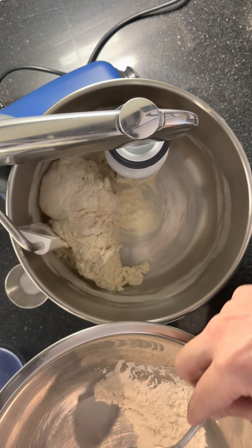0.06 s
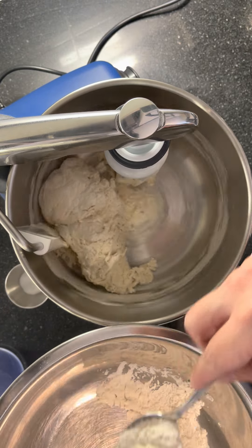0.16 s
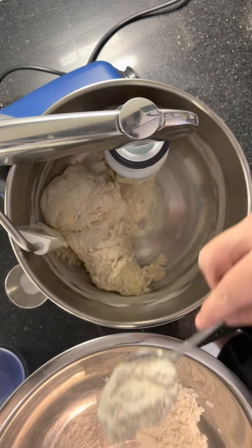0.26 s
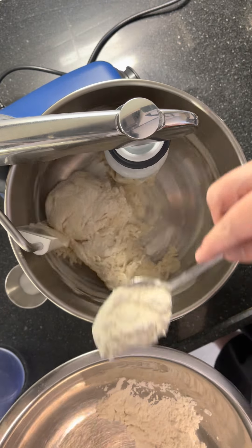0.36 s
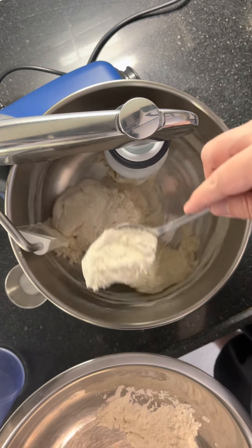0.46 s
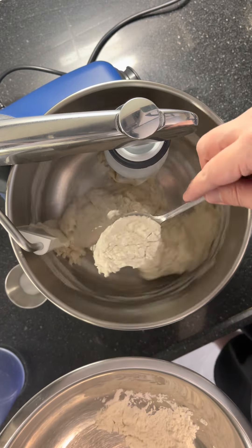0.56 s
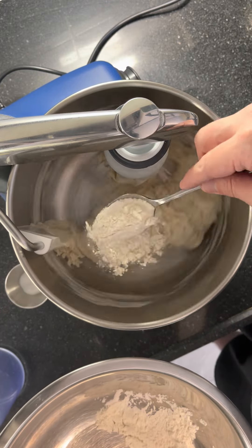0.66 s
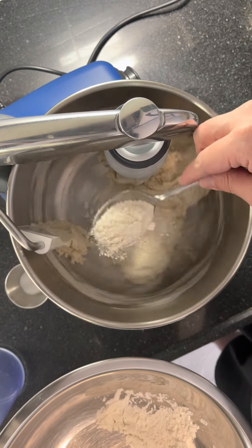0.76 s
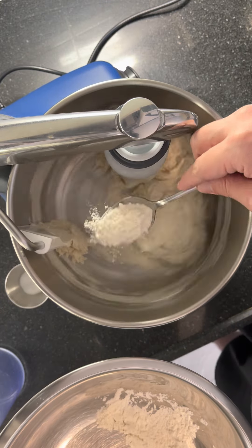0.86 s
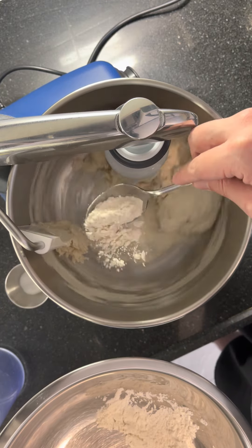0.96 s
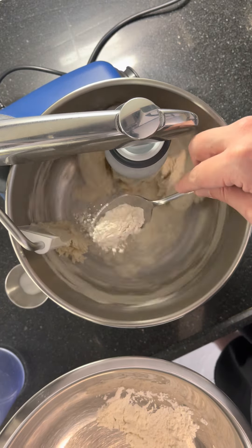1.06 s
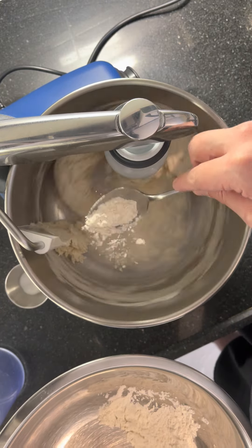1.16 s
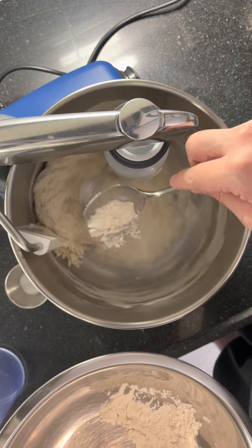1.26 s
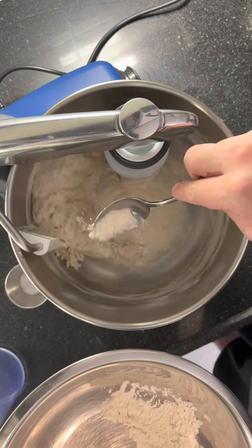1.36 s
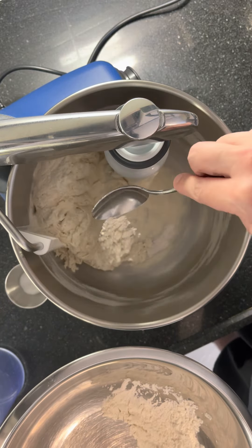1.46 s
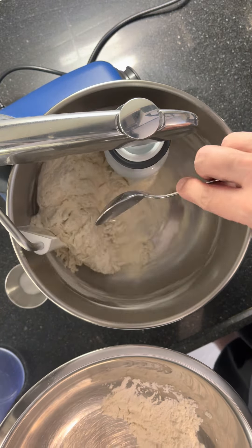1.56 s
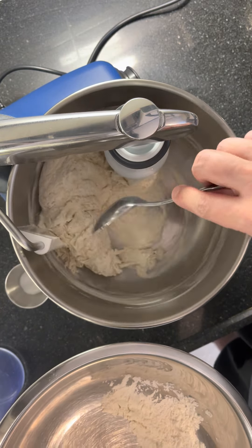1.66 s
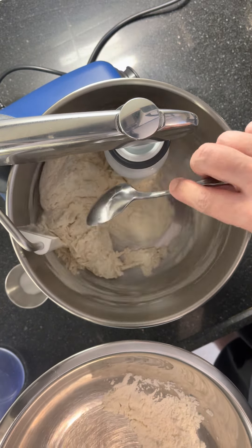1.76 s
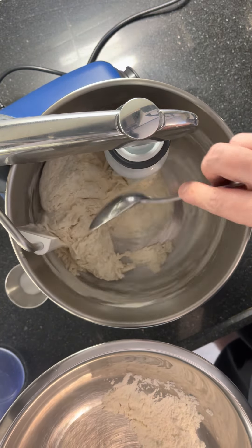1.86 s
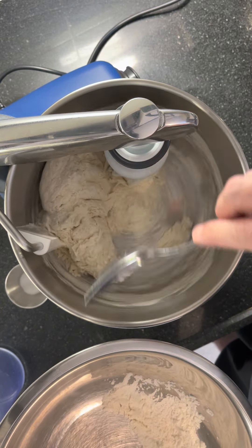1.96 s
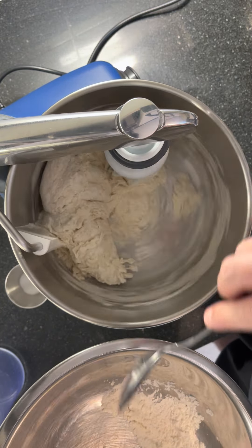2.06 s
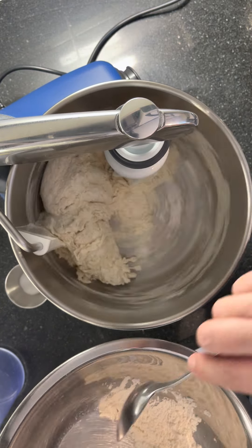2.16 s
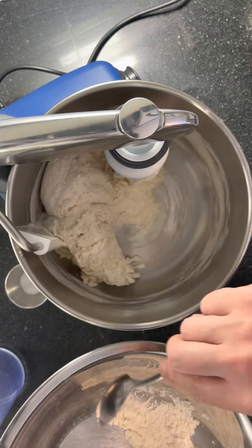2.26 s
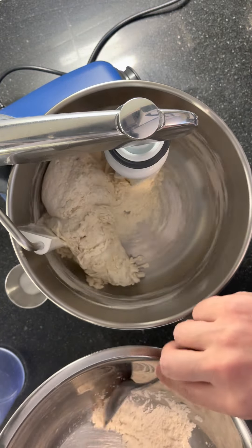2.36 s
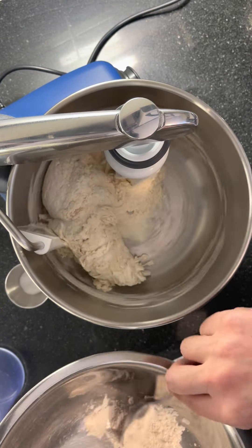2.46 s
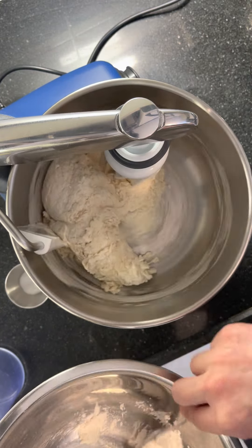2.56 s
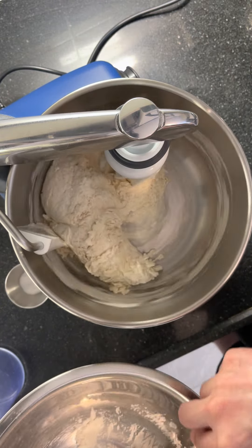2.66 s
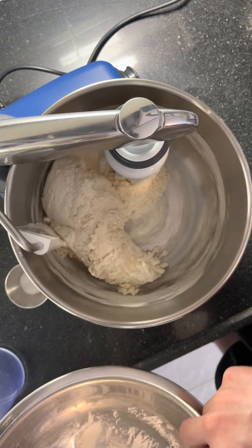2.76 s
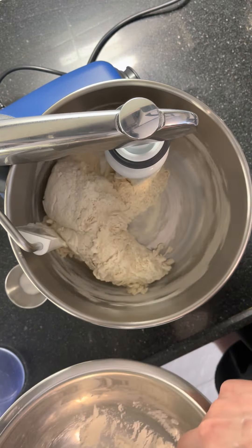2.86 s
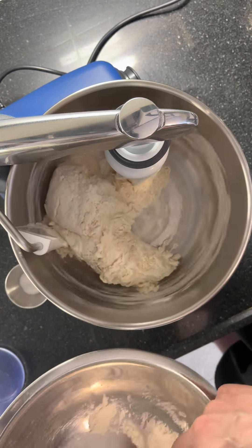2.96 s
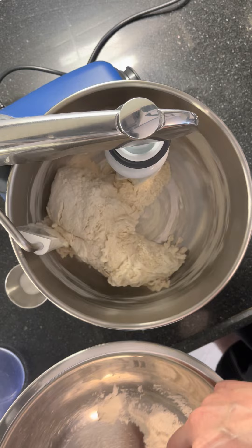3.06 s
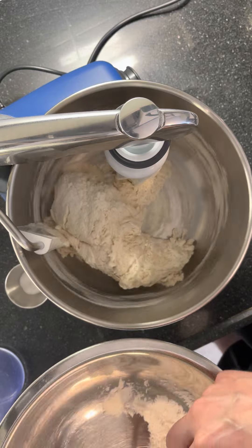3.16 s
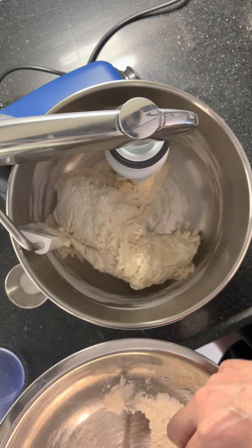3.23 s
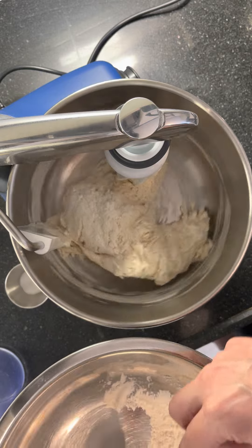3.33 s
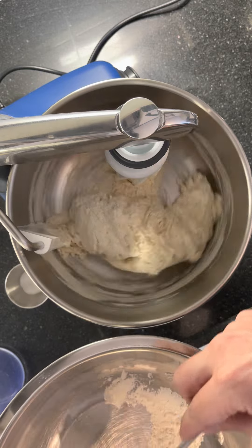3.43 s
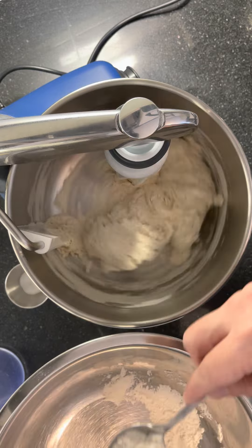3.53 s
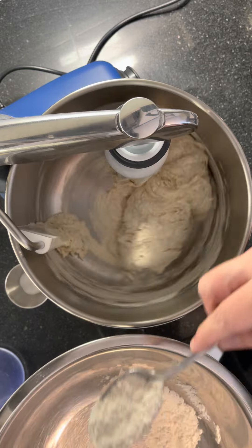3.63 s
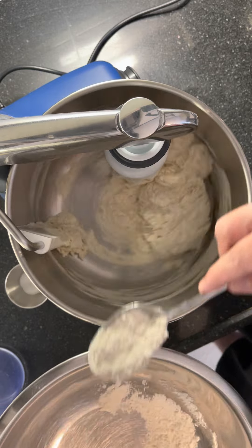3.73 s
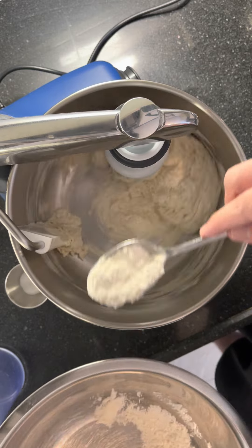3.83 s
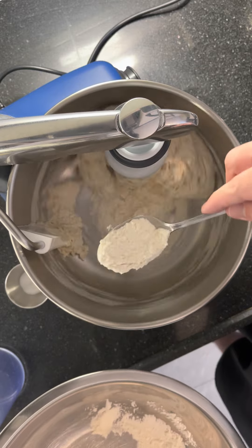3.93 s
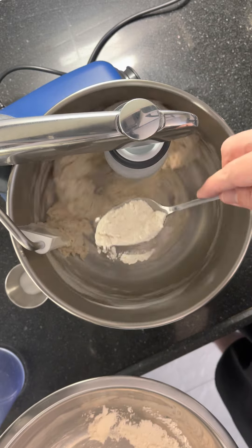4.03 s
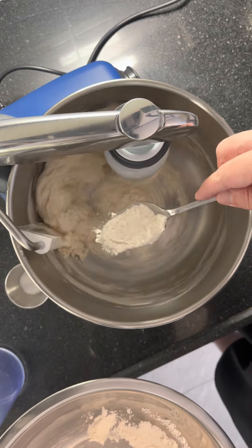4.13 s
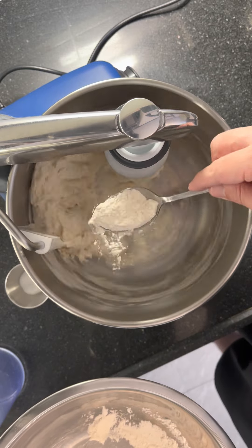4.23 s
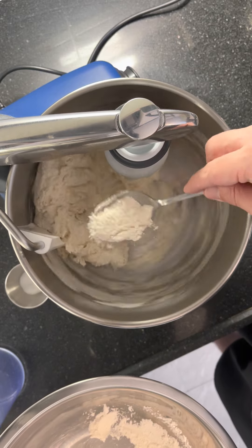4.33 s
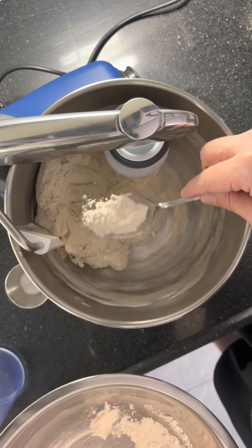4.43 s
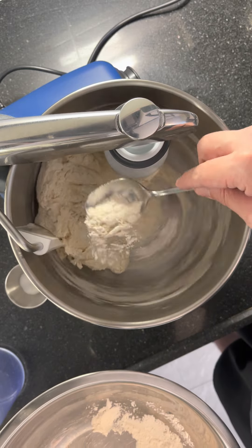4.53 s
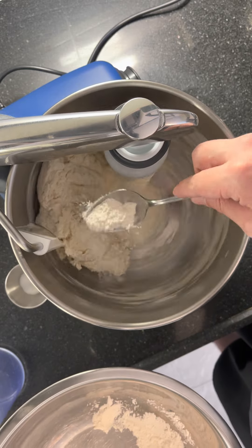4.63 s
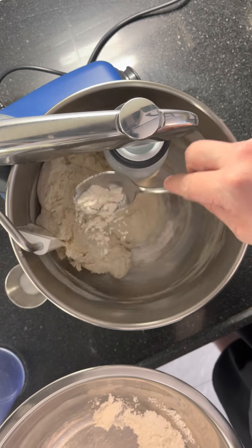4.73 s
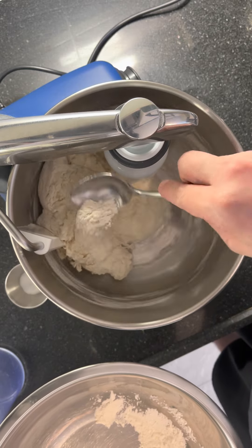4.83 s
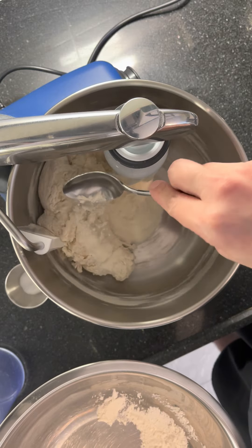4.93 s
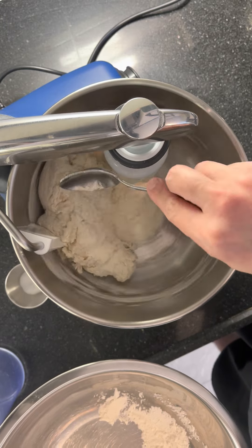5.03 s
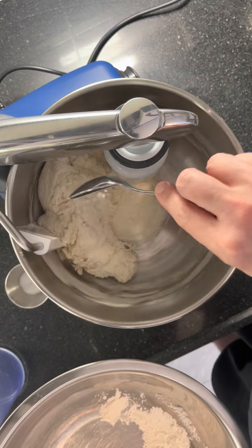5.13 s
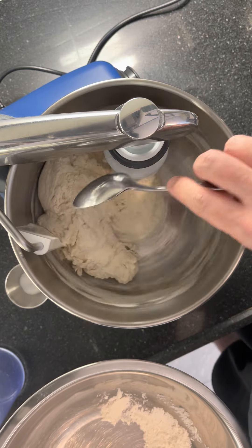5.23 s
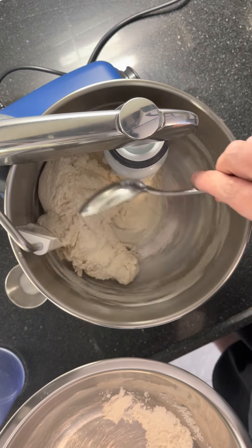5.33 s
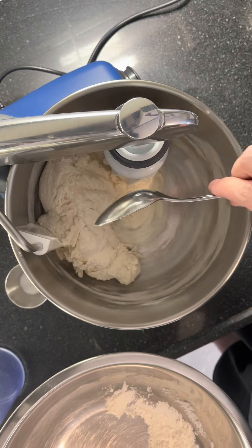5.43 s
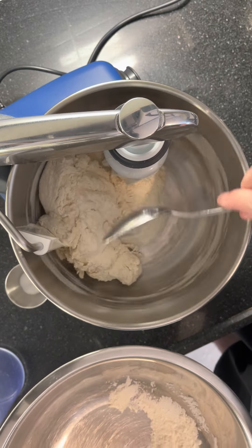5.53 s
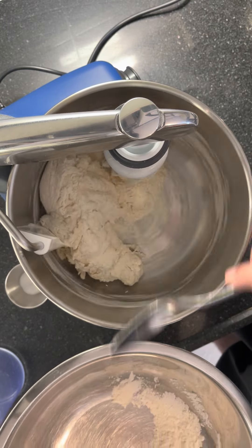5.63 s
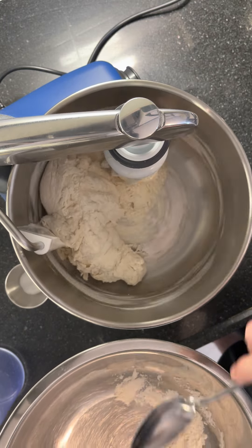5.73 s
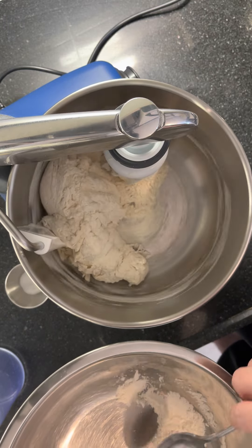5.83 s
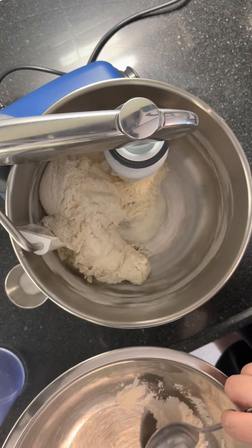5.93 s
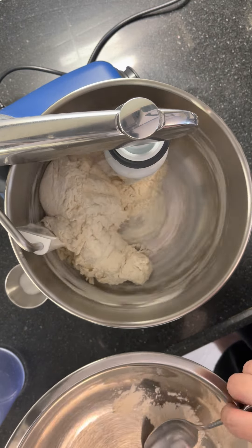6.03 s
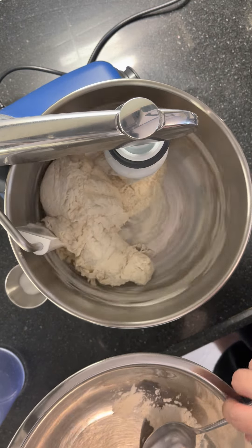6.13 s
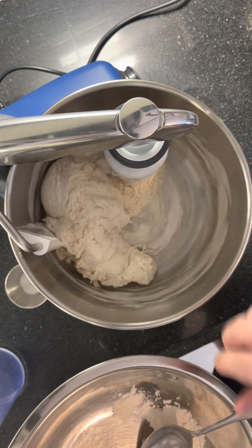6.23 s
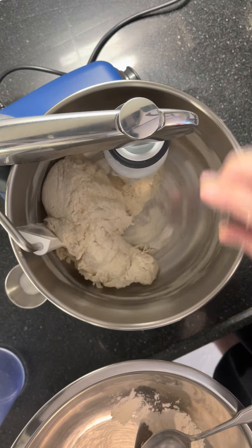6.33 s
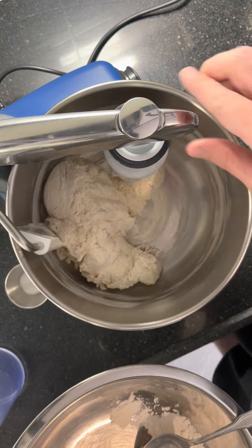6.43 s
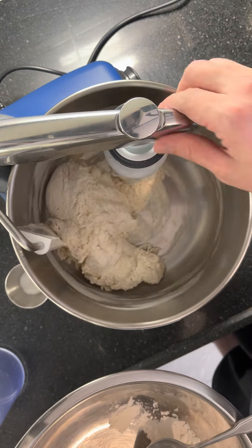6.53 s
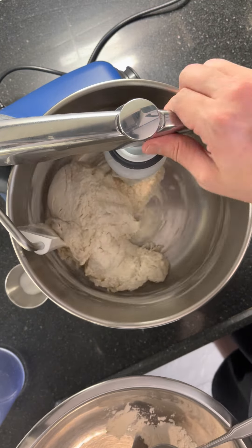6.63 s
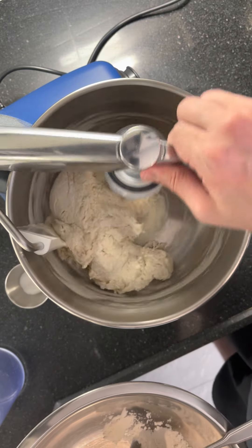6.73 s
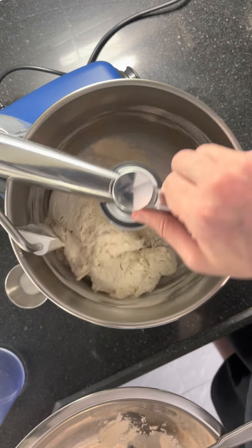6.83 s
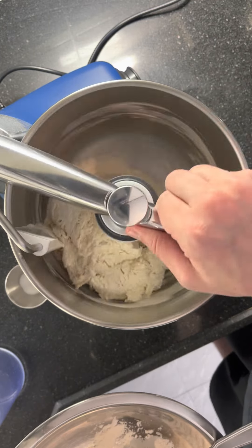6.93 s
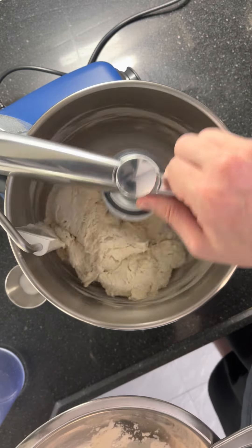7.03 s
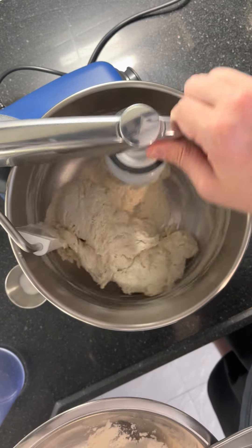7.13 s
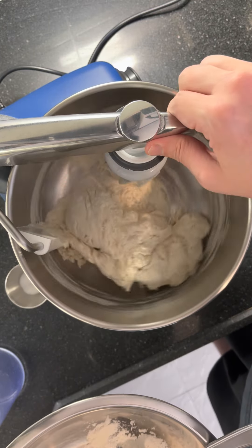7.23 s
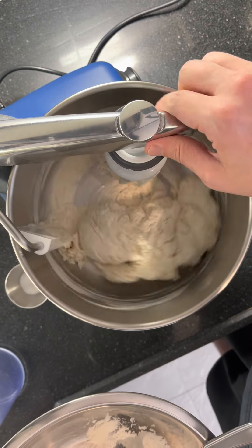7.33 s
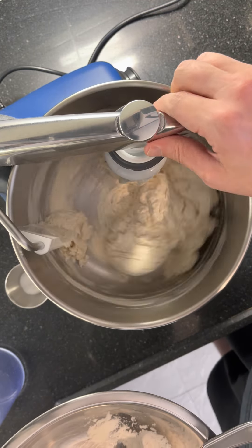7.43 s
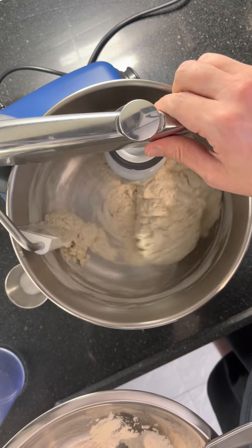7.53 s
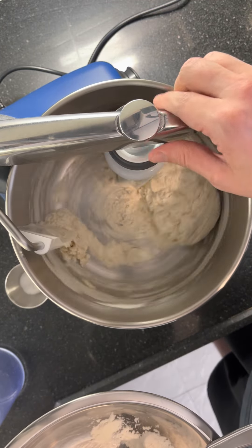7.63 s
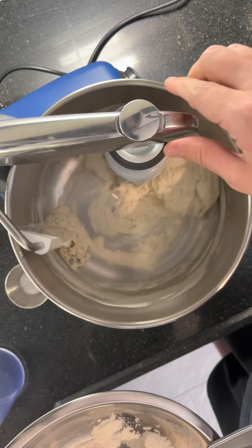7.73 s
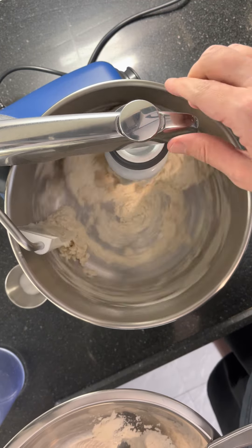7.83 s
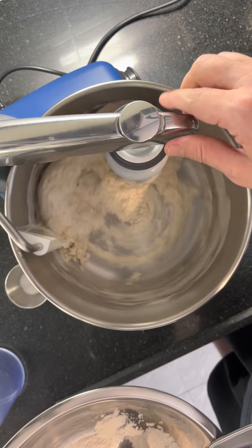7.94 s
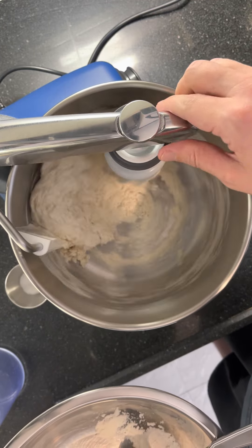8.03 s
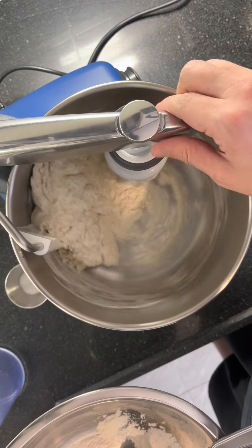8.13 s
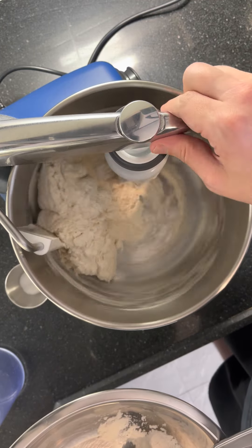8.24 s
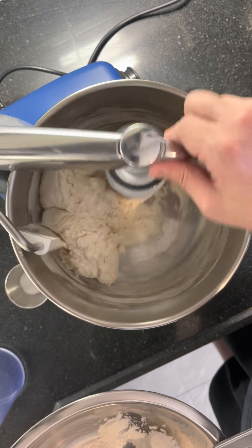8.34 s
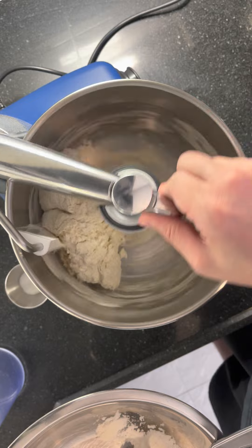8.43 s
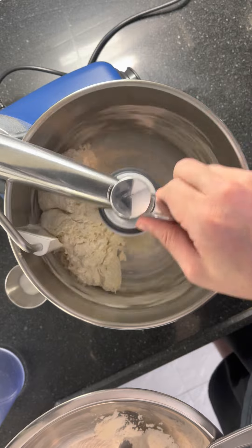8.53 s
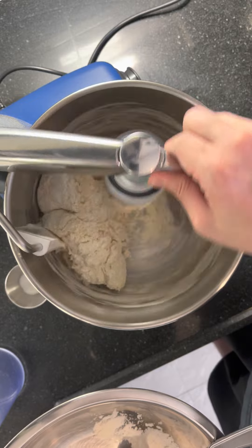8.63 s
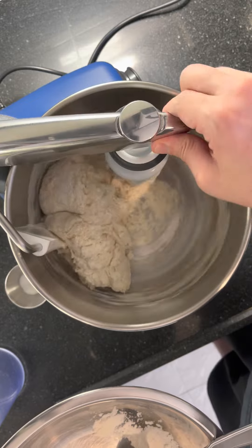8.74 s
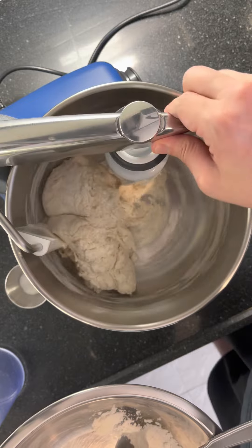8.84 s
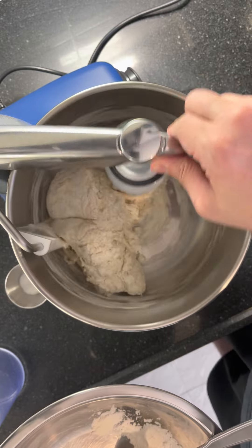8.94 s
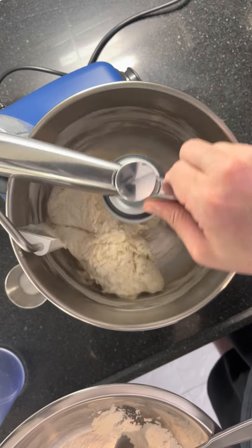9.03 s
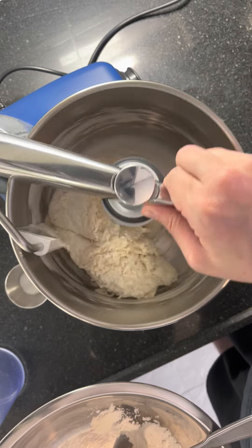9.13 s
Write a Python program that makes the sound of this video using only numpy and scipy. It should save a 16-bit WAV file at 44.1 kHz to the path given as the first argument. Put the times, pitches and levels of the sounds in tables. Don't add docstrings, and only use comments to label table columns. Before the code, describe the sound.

Continuous kneading machine noise heard from close by: droning motor, mains buzz, rough low roar and airy hiss. The dough makes the motor sag and lift, the arm groan low and the counter shudder softly. Few metallic spoon knocks stand out, a bright pair early, a strong double clank about two thirds through, and light touches near the end, with a short kitchen tail.

```python
import sys
import numpy as np
from scipy import signal
from scipy.fft import rfft, irfft, next_fast_len
from scipy.io import wavfile
from scipy.ndimage import uniform_filter1d

SR = 44100
rng = np.random.default_rng(int(sys.argv[2]) if len(sys.argv) > 2 else 0)


def persist_wave(psi):
    counts = np.round(np.clip(psi, -1, 1) * 32767).astype(np.int16)
    wavfile.write(sys.argv[1], SR, np.atleast_2d(counts).T)


def boost(x):
    u = np.asarray(x, float) / 20
    return 10 ** u


N = 405279

MAINS_HZ = 50.0116
LOADED_HZ, USUAL_HZ = 200.047, 202
WHEEL = 0.117377

# time in seconds, change of the base
# motor line in Hz, spread in seconds.
DOUGH_PULLS = [(-0.029, 2.33, 0.098), (0.644, 4.73, 0.227), (1.186, -7.34, 0.17), (1.361, 5.82, 0.184),
               (2.282, 5.73, 0.181), (3.064, 4.18, 0.216), (3.679, 2.54, 0.121), (4.071, -6.84, 0.13),
               (4.675, 7.03, 0.209), (5.576, 3.38, 0.19), (6.383, 3.04, 0.161), (7.442, 2.4, 0.213),
               (7.807, -5.51, 0.141), (8.078, 1.59, 0.077), (8.406, 2.59, 0.09), (8.974, 9.2, 0.377),
               (9.267, -6.09, 0.146)]


def rotor_speed():
    return LOADED_HZ + bumps(DOUGH_PULLS)


# rotor order, mains order, lag in the housing in seconds, start in turns.
HUM_LINES = [(8 * WHEEL, 0, .0423, -.429), (.99989, 0, .0276, .509), (0, 4, 0, .459),
             (7 * WHEEL, 0, .025, .215), (9 * WHEEL, 0, .028, -.186)]
# level in dB, level change in dB per Hz of rotor speed.
HUM_LEVELS = [(-24, -0.01), (-29.5, -0.5), (-25, -0.5), (-38, 0), (-34.5, -0.5)]


def beating_hum(speed):
    rotor = np.cumsum(speed) / SR
    mains = MAINS_HZ * np.arange(N) / SR
    surplus = speed - USUAL_HZ
    out = np.zeros(N)
    for (order, multiple, lag, start), (db, db_per_hz) in zip(HUM_LINES, HUM_LEVELS):
        turns = order * rotor + multiple * mains - lag * surplus + start
        level = boost(db + db_per_hz * surplus)
        out += np.sqrt(2) * level * np.cos(2 * np.pi * turns)
    return out


ROTOR_MULTIPLES = (.316, .379, .5, 2, 2.5, 4, 5, 5.5, 6, 7, 8.5, 30.5, 42, 4.5, 18)
# level in dB, level change in dB per Hz of rotor speed.
ROTOR_LEVELS = [(-50, 0.26), (-54, -0.11), (-45.5, -1), (-47, -1.4), (-49, -0.25), (-48.5, 0.7), (-47.5, 0),
                (-51.5, -1), (-48, -1.1), (-60, .1), (-61.5, 1.5), (-63, .1), (-67, 0), (-54, 0), (-66, 0)]


def rotor_tones(speed):
    return loaded_tones(speed, ROTOR_MULTIPLES, ROTOR_LEVELS, waver_db=4.0, per_s=6.0)


BAR_MULTIPLES = (24, 36, 48)
# level in dB, level change in dB per Hz of rotor speed.
BAR_LEVELS = [(-51, -.6), (-55.5, .5), (-51, -.1)]


def brush_bars(speed):
    return loaded_tones(speed, BAR_MULTIPLES, BAR_LEVELS, waver_db=2.2, per_s=8.0)


WHEEL_MULTIPLES = (2, 3, 4, 10, 11, 12, 14, 16, 19, 24)
# level in dB, in the same order.
WHEEL_LEVELS = (-56, -49.5, -44, -52, -44, -42.5, -47.5, -45, -44.5, -50)


def drive_wheel(speed, piled):
    wheel_turns = WHEEL * np.cumsum(speed) / SR
    db = np.reshape(WHEEL_LEVELS, (-1, 1)) + 2.5 - 3 * piled
    return tones(np.outer(WHEEL_MULTIPLES, wheel_turns), db, waver_db=0.0, per_s=9.8).sum(0)


MAINS_MULTIPLES = (1, 2, 6, 8)
# level in dB, in the same order.
MAINS_LEVELS = (-48.5, -46, -45, -49.5)


def mains_buzz():
    mains = MAINS_HZ * np.arange(N) / SR
    return tones(np.outer(MAINS_MULTIPLES, mains), MAINS_LEVELS, waver_db=-1.5, per_s=2.1).sum(0)


SLOT_MULTIPLES = (12, 11.5, 11, 10.5, 10, 9.5)
# level in dB, in the same order.
SLOT_LEVELS = (0, -.5, -9, -14, -18, -22)
# time in seconds, swell in dB,
# spread in seconds.
WHINE_SWELLS = [(0.147, 5.6, 0.051), (0.54, 8.6, 0.099), (1.162, 12.7, 0.22), (1.632, 8.51, 0.067),
                (1.844, 7.2, 0.048), (2.29, 10.8, 0.23), (3.038, 8.4, 0.16), (3.566, 3.8, 0.55),
                (3.923, 9.3, 0.086), (4.222, 12.6, 0.058), (4.461, 10, 0.082), (4.887, 7.3, 0.042),
                (5.175, 9.8, 0.091), (5.586, 10.98, 0.18), (6.035, 12, 0.096), (6.682, 9.3, 0.299),
                (7.153, 7.5, 0.095), (7.815, 13.9, 0.2), (8.349, 16, 0.061), (8.548, 8, 0.053),
                (8.846, 7.42, 0.18), (9.156, 10.7, 0.059)]


def slot_whine(speed):
    hz = np.outer(SLOT_MULTIPLES, speed)
    trade_db = 4.5 * waver(len(hz), per_s=12.0)
    trade_db[0] -= 0.6 * (speed - USUAL_HZ)
    lift = boost(np.reshape(SLOT_LEVELS, (-1, 1)) + trade_db) * housing(hz) ** 0.85
    lift /= np.sqrt((lift ** 2).sum(0))
    lines = tones(np.cumsum(hz, axis=1) / SR, np.zeros(len(hz)), waver_db=3.7, per_s=15.0)
    return boost(-46 + bumps(WHINE_SWELLS)) * (lift * lines).sum(0)


# start in seconds, belly level in dB, wall level in dB, rim level in dB, ring time factor.
SPOON_KNOCKS = [
    (2.318, -16.5, -35, -16, 0.39),
    (2.419, -26, -35, -37, 0.46),
    (2.61, -38, -31.5, -37, 0.92),
    (5.976, -12.5, -33, -34, 0.75),
    (6.018, -25.5, -53, -47, 0.89),
    (6.035, -31, -10, -14, 0.76),
    (8.469, -52, -37, -35, 0.83),
    (8.738, -32, -43, -33, 0.36),
]
# frequency in Hz, level in dB, 60 dB decay in seconds.
BELLY_MODES = [(345, 4, 0.14), (546, 9, 0.042), (660, 3, 0.06), (830, -4, 0.082), (1050, -4, 0.062),
               (1346, -14, 0.077)]
WALL_MODES = [(1220, -20, 0.26), (1380, -7.5, 0.4), (1750, 0, 0.15), (1837, -1, 0.2), (2050, -10, 0.53),
              (2300, 3.5, 0.023), (2932, -16.5, 0.32), (3210, -15.5, 0.36), (3520, -17.5, 0.34),
              (4040, -7, 0.22), (4340, -12.5, 0.13), (5000, -7, 0.06), (5740, 2.5, 0.033), (6380, -4, .15)]
RIM_MODES = [(5830, -14, 0.063), (6660, -12, 0.15), (6730, -1.5, 0.084), (7400, -14, 0.19),
             (7250, -1.5, 0.1), (8200, -10.5, 0.097), (9700, -1, 0.05), (11010, -5, 0.14),
             (13000, -23, 0.045)]


def spoon():
    out, t = np.zeros(N + SR), np.arange(SR // 3) / SR
    dull = signal.butter(2, 9000, fs=SR, output="sos")
    for start, belly_db, wall_db, rim_db, damping in SPOON_KNOCKS:
        crack = signal.sosfilt(dull, rng.standard_normal(len(t)))
        crack *= boost(max(wall_db, rim_db) - 18 - 60 * t / 0.1)
        ring = bowl_modes(WALL_MODES, t, wall_db - 14, damping, 0)
        ring += bowl_modes(RIM_MODES, t, rim_db - 7, damping, 0)
        ring *= 1 + 1.2 * np.exp(-t / 0.005)
        belly_tilt = -5.5 + 0.56 * (rim_db - wall_db)
        ring += bowl_modes(BELLY_MODES, t, belly_db - 8, damping, belly_tilt)
        contact = np.minimum(t / 0.0027, 1)
        out[round(start * SR):][:len(t)] += (ring + crack) * contact
    tail = rng.standard_normal(len(t)) * boost(-60 * t / 0.3) * (t > 0.004)
    tail /= np.linalg.norm(tail)
    return (out + boost(-3.5) * signal.fftconvolve(out, tail)[:len(out)])[:N]


def bowl_modes(modes, t, blow_db, damping, tilt_db):
    hz, db, t60 = np.repeat(modes, repeats=3, axis=0).T[:, :, None]
    detune, start = rng.random((2, len(hz), 1))
    level = boost(blow_db + db + tilt_db * np.log2(hz / hz[0]) - 60 * t / (t60 * damping))
    turns = hz * (1 + 0.043 * (detune - 0.5)) * t + 0.43 * start
    return (level * np.sin(2 * np.pi * turns)).sum(0)


# time in seconds, swell in dB, spread in seconds.
ARM_DRAGS = [(.25, 7, .12), (.85, 17, 0.33), (1.2, 5, .1), (2.0, 8, 0.18), (2.85, 13.5, .15),
             (3.4, 14.5, 0.24), (4.08, 17.5, 0.11), (5.3, 12.5, 0.22), (6.5, 9.5, 0.25), (7.4, 14.5, 0.22),
             (7.95, 6, 0.075), (8.8, 11, 0.14)]


def arm_groan():
    centre_hz, width_hz = 383.4, 39
    return boost(-49 + bumps(ARM_DRAGS)) * ringing_noise(centre_hz - width_hz / 2, centre_hz + width_hz / 2)


# time in seconds, swell in dB, spread in seconds.
BOWL_LURCHES = [(.67, 11, .1), (1.75, 11, .15), (2.6, 8.8, .07), (2.9, 18, .07), (3.43, 9, 0.35),
                (4.12, 25, 0.083), (4.72, 14, 0.047), (5.47, 15, .05), (6.14, 18, 0.13), (6.5, 22.4, 0.18),
                (7.235, 21, 0.067), (7.97, 17, 0.13), (8.757, 22, 0.057)]


def counter_shudder():
    return boost(-54.5 + bumps(BOWL_LURCHES)) * ringing_noise(70, 81)


# frequency in Hz, level in dB per Hz.
HISS_COLOUR = [(1500, -24), (2800, -6), (4500, -9.5), (5500, -5), (6500, -2), (9000, -4.5), (10800, 1.5),
               (12000, -9.5), (13500, -20), (14200, -38), (14900, -3.5), (15500, -45)]


def scraper_hiss(piled):
    hiss = noise(HISS_COLOUR, frame_count=1024, patchy_db=1.5, flicker_db=0.54)
    return boost(-39.5 + 5.5 * piled) * hiss


# frequency in Hz, level in dB per Hz.
ROAR_COLOUR = [(28, -49.5), (40, -9), (50, -26), (80, -0.5), (125, -13.5), (190, 3), (260, -5), (450, -9),
               (650, -9.5), (1100, -9.5), (1500, -18.5), (2400, -19.5), (2900, -34.5), (4500, -38.5)]


def housing_roar(piled):
    roar = noise(ROAR_COLOUR, frame_count=2048, patchy_db=2.0, flicker_db=0.65)
    return boost(-31 + 0.5 * piled) * roar


# frequency in Hz, likeness from 0 to 1.
PORT_LIKENESS = [(100, 1), (400, .92), (750, .6), (1700, .86), (2300, .75), (2650, .3), (3500, .5),
                 (4400, .55), (5100, .7), (5900, .97), (8000, .92), (8900, .98), (9400, .98), (11500, .9)]


def noise(spectrum, frame_count, patchy_db, flicker_db):
    hop = frame_count // 4
    frames, hz = N // hop + 5, np.fft.rfftfreq(frame_count, 1 / SR)
    a, b, c, d, patches = rng.standard_normal((frames, len(hz), 5)).T
    flicker = smooth(patches, len(hz) // 3, 10)
    patches = smooth(patches, 6, 12)
    same = np.clip(read(PORT_LIKENESS, hz), 0, 1)[:, None]
    left = a + 1j * b
    right = same * left + np.sqrt(1 - same ** 2) * (c + 1j * d)
    colour = (boost(read(spectrum, hz)) * housing(hz))[:, None]
    z = np.array([left, right]) * colour * boost(patchy_db * patches + flicker_db * flicker)
    return evened(signal.istft(z, nperseg=frame_count, noverlap=frame_count - hop)[1][:, :N])


def smooth(grid, bins, frames):
    blurred = uniform_filter1d(grid, size=bins, axis=0)
    return evened(uniform_filter1d(blurred, size=frames, axis=1))


def ringing_noise(low_hz, high_hz):
    ring = signal.butter(2, [low_hz, high_hz], "bandpass", fs=SR, output="sos")
    return evened(signal.sosfilt(ring, rng.standard_normal(N)))


# frequency in Hz, width in Hz, lift in dB.
RESONANCES = [(188, 22.3, 7.5), (385, 56, 6), (430, 6.7, 4), (509.4, 19.6, 10.5), (528, 20, 0.5),
              (710, 120, -1), (1074, 8.8, 2), (1221, 17, 7), (1863, 30, -22), (2344, 10.7, 12),
              (4086, 38, -2), (5900, 150, -7), (5900, 45, -3), (6540, 200, -2), (7530, 120, 5),
              (8900, 74, 0), (9000, 100, -27), (9490, 930, 7)]


def housing(hz):
    return 1 + sum((boost(db) - 1) / (1 + (2 * (hz - f) / width) ** 2) for f, width, db in RESONANCES)


def loaded_tones(speed, multiples, levels, waver_db, per_s):
    surplus = np.maximum(speed - USUAL_HZ, -3.5)
    db, db_per_hz = np.transpose(levels)[:, :, None]
    turns = np.outer(multiples, np.cumsum(speed) / SR)
    return tones(turns, db + db_per_hz * surplus, waver_db, per_s).sum(0)


def tones(turns, db, waver_db, per_s):
    level = boost(np.reshape(db, (len(turns), -1)) + waver_db * waver(len(turns), per_s))
    return np.sqrt(2) * level * np.cos(2 * np.pi * (turns + rng.random((len(turns), 1))))


def waver(count, per_s):
    t = np.arange(0, N + 256, 256) / SR
    f = np.geomspace(0.3, per_s, 24)[:, None]
    curves = []
    for start in rng.random((count, 24, 1)):
        slow = evened((np.sin(2 * np.pi * (f * t + start)) / np.sqrt(f)).sum(0))
        curves.append(np.interp(np.arange(N) / SR, t, slow))
    return np.array(curves)


def bumps(rows):
    t = np.arange(0, N + 64, 64) / SR
    bells = sum(height * np.exp(-0.5 * ((t - s) / spread) ** 2) for s, height, spread in rows)
    return np.interp(np.arange(N) / SR, t, bells)


def evened(x):
    return x / np.sqrt(np.mean(x ** 2) + 1e-20)


def read(points, hz):
    f, value = np.transpose(points)
    return np.interp(np.log(hz + 1), np.log(f + 1), value)


# frequency in Hz, phase in radians.
LEFT_LEAD = [(0, 0), (1900, 0), (2400, .75), (3700, .5), (4620, 1.8), (4810, 3.14), (5250, 5.1),
             (5900, 6.28), (8700, 9.15), (9550, 9.7), (11650, 11.6), (12000, 12.55), (14400, 12.7),
             (14900, 15.5)]
# frequency in Hz, balance in dB.
LEFT_BALANCE = [(90, 0), (150, -1), (500, -2), (800, -1.5), (1200, .5), (2700, -1), (4500, 0)]


def ports(x):
    size = next_fast_len(N + 2048)
    hz = np.fft.rfftfreq(size, 1 / SR)
    lead = np.interp(hz, *np.transpose(LEFT_LEAD))
    half = boost(read(LEFT_BALANCE, hz) / 2) * np.exp(0.5j * lead)
    return irfft(rfft(x, size) * np.array([half, 1 / half]), size)[..., :N]


# time in seconds, share from 0 to 1.
PILED_DOUGH = [(0, 0.85), (.6, 0.46), (1.25, 0.2), (1.36, 0.85), (2.6, 0.78), (3.3, 0.67), (4.15, 0.05),
               (4.3, 0.85), (4.7, 0.83), (5.6, 0.82), (6.3, 0.55), (6.8, 0.8), (7.2, 0.4), (7.9, 0.04),
               (8.12, 1), (8.7, 0.58), (9.19, 1)]


def scene():
    speed = rotor_speed()
    piled = np.interp(np.arange(N) / SR, *np.transpose(PILED_DOUGH))
    motor = beating_hum(speed) + rotor_tones(speed) + brush_bars(speed)
    motor += drive_wheel(speed, piled) + mains_buzz() + slot_whine(speed)
    knocks_and_rings = spoon() + arm_groan() + counter_shudder()
    background = scraper_hiss(piled) + housing_roar(piled)
    return ports(motor + knocks_and_rings + background)


def top_cut(x):
    return signal.sosfilt(signal.butter(12, 15490, fs=SR, output="sos"), x)


def record(dry):
    band = signal.butter(4, 15800, fs=SR, output="sos")
    mix = signal.sosfiltfilt(band, dry)
    return top_cut(mix)


dry = scene()
out = record(dry)
persist_wave(out)
```